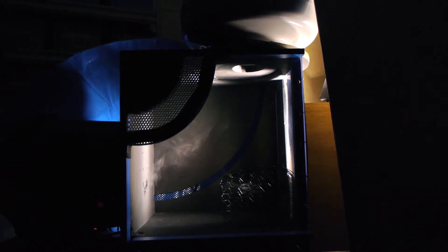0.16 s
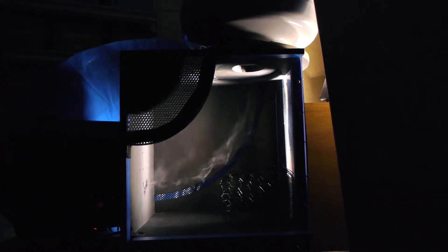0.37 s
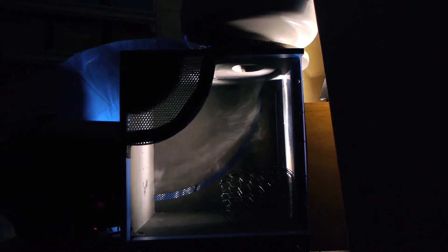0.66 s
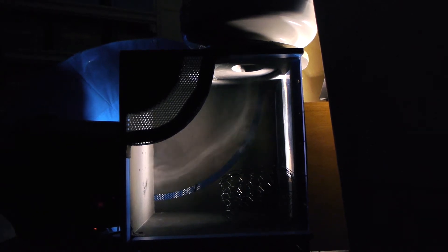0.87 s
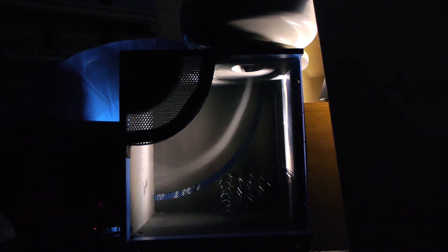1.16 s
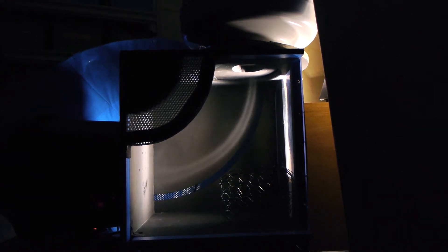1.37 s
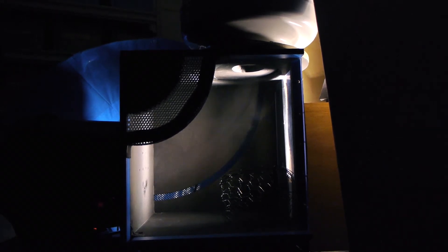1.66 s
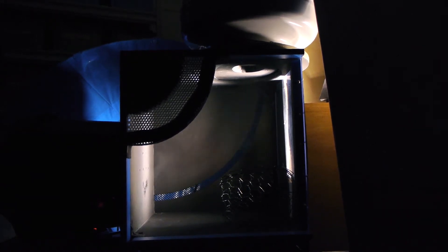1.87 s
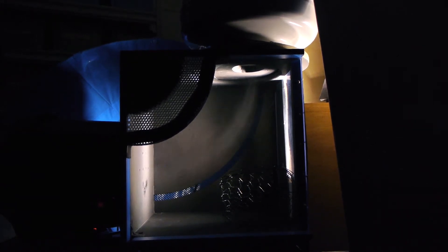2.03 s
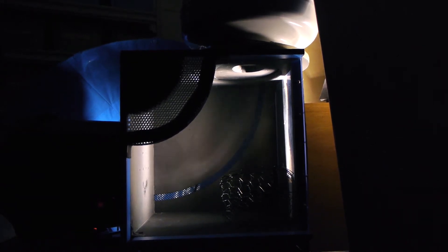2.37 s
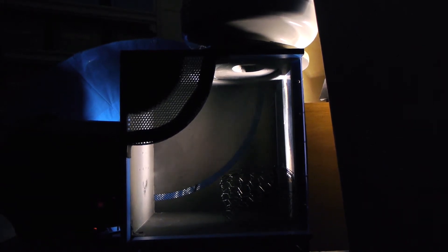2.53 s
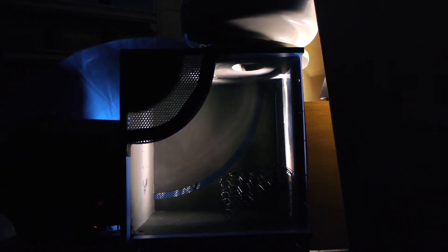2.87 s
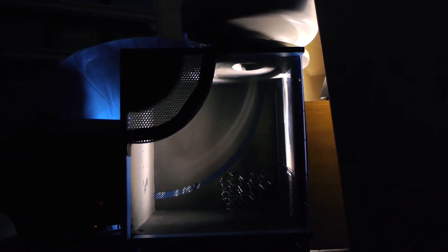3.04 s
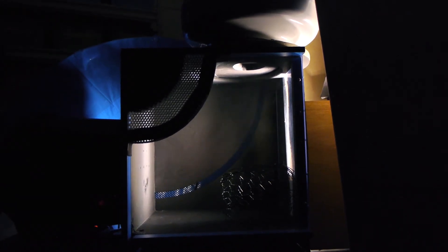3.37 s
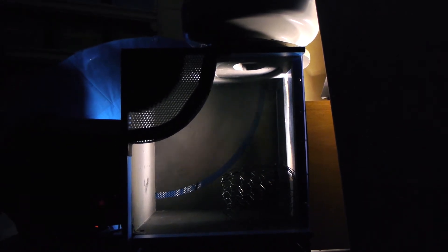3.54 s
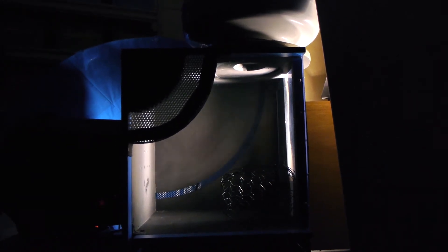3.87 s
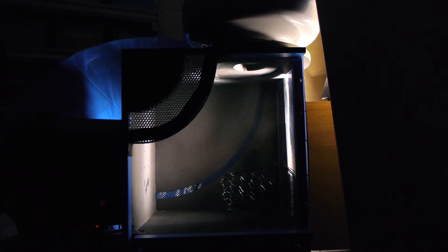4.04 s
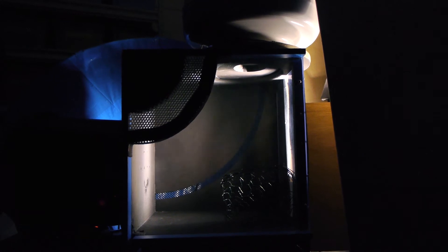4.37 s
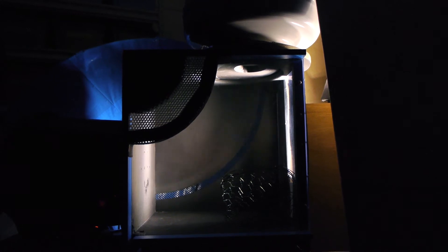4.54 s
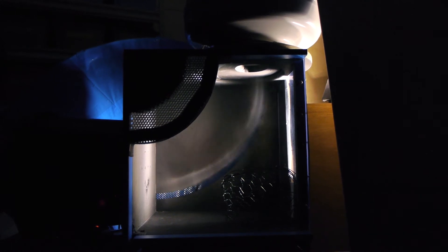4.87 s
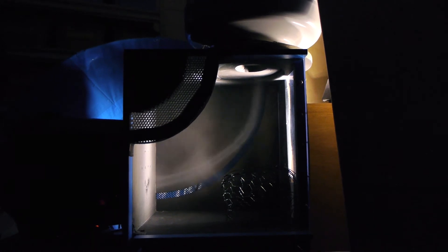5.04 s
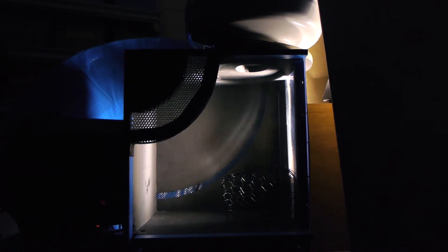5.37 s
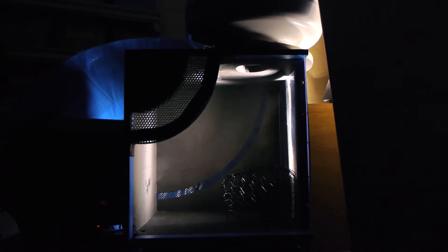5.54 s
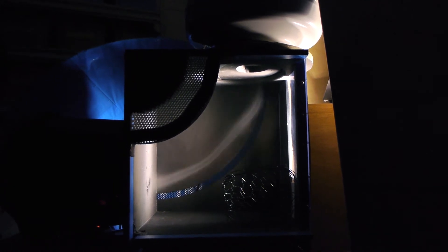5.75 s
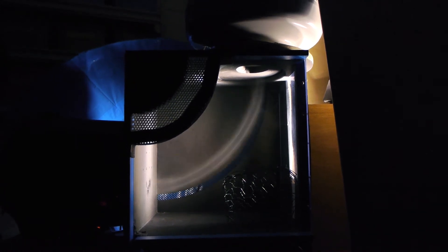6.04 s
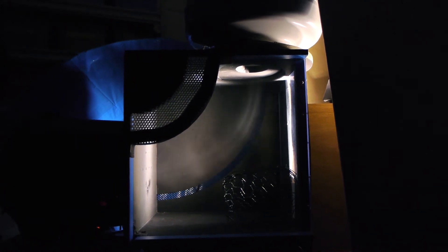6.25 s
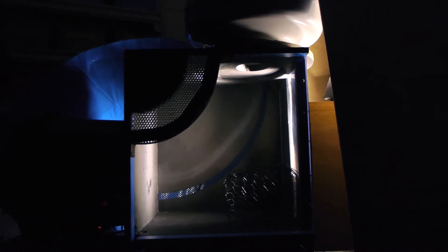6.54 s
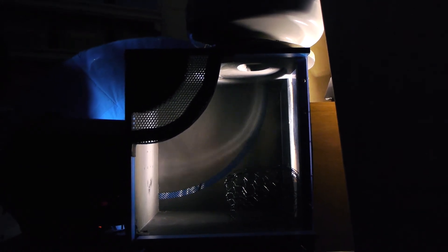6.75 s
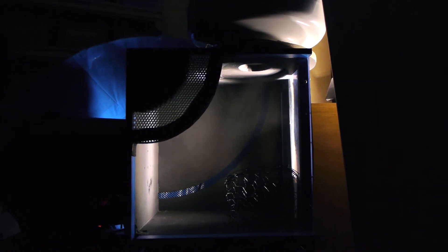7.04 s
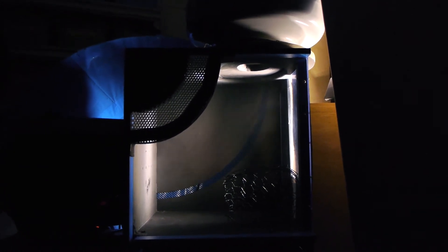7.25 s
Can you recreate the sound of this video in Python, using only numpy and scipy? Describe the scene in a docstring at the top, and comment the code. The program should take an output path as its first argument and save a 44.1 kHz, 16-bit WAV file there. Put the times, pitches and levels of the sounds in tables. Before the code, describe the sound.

Close to a duct fan drawing air through a small hard-walled box indoors. A faint electrical hum and dull room noise come first, with soft hiss puffs and a thin climbing whine. Airflow swells over three seconds, a low tone wavers and breaks up, then a loud broad rush holds with a fluttering deep boom.

```python
"""An inline duct fan draws air through a small enclosure, heard from close by.
At first summed sine tones make the motor's hum and drone over a dull noise background, with soft hiss puffs;
faint rotor harmonics climb and chirp through the housing's resonances. As the draught builds they sink under
filtered noise, the rush of air ringing the duct. Near two seconds a deep mode starts to sing unsteadily,
and breaks up after three, as a low boom of shaken duct modes grows, with separate throbs from strong eddies."""
import sys
import numpy as np
from scipy import signal
from scipy.fft import rfft, irfft, next_fast_len
from scipy.io import wavfile
from scipy.ndimage import uniform_filter1d

SR = 44100
rng = np.random.default_rng(int(sys.argv[2]) if len(sys.argv) > 2 else 0)


def file_out(sig):
    """Save sig as 16-bit WAV at sys.argv[1]."""
    # one column per channel
    cols = np.atleast_2d(sig).T
    # limit, then scale
    lim = np.clip(cols, -1, 1)
    pcm = np.round(lim * 32767).astype(np.int16)
    wavfile.write(sys.argv[1], SR, pcm)


N = 326781
TIME = np.arange(N) / SR  # s
SIZE = next_fast_len(N, real=True)
FREQS = np.maximum(np.arange(SIZE // 2 + 1) * SR / SIZE, 1)  # Hz, kept above zero for the logarithms


def from_db(db):
    """Logarithmic level: 20 dB is a tenfold amplitude."""
    return 10 ** (np.asarray(db) / 20)


def rms_one(x):
    """Power normalisation: scale to a mean square of one."""
    return x / np.sqrt(np.mean(np.abs(x) ** 2) + 1e-20)


def in_time(rows):
    """Linear interpolation: each column after the time becomes a curve, sample by sample."""
    start_s, *columns = np.transpose(rows)
    return [np.interp(TIME, start_s, column) for column in columns]


def at_hz(points, hz):
    """Logarithmic frequency scale: equal ratios of frequency are equal steps of interpolation."""
    table_hz, values = np.array(points).T
    return np.interp(np.log(hz), np.log(table_hz), values)


def drift(rate_hz):
    """Low-pass noise: a random modulation of spread 1, reaching up to about rate_hz."""
    step, settling = 40, 2000  # made at a lower sample rate; the filter's onset is dropped
    lowpass = signal.butter(2, rate_hz, fs=SR / step, output="sos")
    white = rng.standard_normal(N // step + settling + 2)
    slow = signal.sosfilt(lowpass, white)[settling:]
    return np.interp(np.arange(N) / step, np.arange(len(slow)), rms_one(slow))


def turning(hz):
    """Phase is the integral of frequency: a unit phasor follows the pitch from a random start."""
    cycles = np.cumsum(hz * np.ones(N)) / SR
    return np.exp(2j * np.pi * (cycles + rng.random()))


def bump(centre_s, half_s):
    """Gaussian envelope: a smooth swell of height 1 around a moment."""
    return np.exp(-.5 * ((TIME - centre_s) / half_s) ** 2)


def settle(start_hz, full_hz, settle_s):
    """Exponential approach: a pitch climbs fast at first and then levels off."""
    return full_hz + (start_hz - full_hz) * np.exp(-TIME / settle_s)


# the motor's hum as it takes up the load: start_s [s], pitch_hz [Hz], level_db [dB]
HUM = [(0, 210.7, -48.5), (.63, 216.6, -41), (.85, 218, -49), (1.2, 220, -47.5), (1.4, 221, -63)]
MAINS_HZ, MAINS_DB = 99.7, -52
DRONE_START_HZ, DRONE_FULL_HZ, DRONE_SETTLE_S, DRONE_DB = 103, 121.6, .5, -48.5


def motor(waver):
    """Superposition of tones: mains hum, loaded-motor hum and a deeper drone that swells as it settles."""
    hum_hz, hum_db = in_time(HUM)
    drone_hz = settle(DRONE_START_HZ, DRONE_FULL_HZ, DRONE_SETTLE_S)
    drone_gain = from_db(DRONE_DB) * (1 - np.exp(-TIME / DRONE_SETTLE_S))
    tones = [(MAINS_HZ, from_db(MAINS_DB)), (hum_hz, from_db(hum_db)), (drone_hz, drone_gain)]
    out = 0
    for hz, gain in tones:
        unsteady = 1 + waver * drift(22.0)
        out = out + gain * unsteady * turning(hz).real
    return np.sqrt(2) * out


# spectrum of the room's background: pitch_hz [Hz], relative level_db [dB per Hz]
ROOM = [(30, -20), (55, -4), (85, 3), (130, -7), (250, -9), (490, -4), (630, -8), (800, -27), (1400, -33),
        (2000, -24), (6000, -29), (15000, -43)]
FLOOR_DB = -56.5


def room(wide_above_hz):
    """Interaural coherence: a dull steady noise, alike at both ears in the bass and wide in the treble."""
    shared, left, right = rfft(rng.standard_normal((3, SIZE)))
    ratio = FREQS / wide_above_hz
    noise = (shared + ratio * np.array([left, right])) / np.sqrt(1 + ratio ** 2)
    shaped = noise * from_db(at_hz(ROOM, FREQS))
    return from_db(FLOOR_DB) * rms_one(irfft(shaped, SIZE)[:, :N])


# rotor tones: multiple of the base tone [ratio], level_db before the housing's lift [dB]
ROTOR = [(4, -67), (6, -67), (7, -66), (9, -79), (10, -86), (11, -74.5), (12, -77.5), (13, -79.5)]
# resonances of the fan housing: centre_hz [Hz], width_hz [Hz], lift_db [dB]
HOUSING = [(348, 70, 9), (984, 58, 22)]
ROTOR_START_HZ, ROTOR_FULL_HZ, SPIN_UP_S = 68, 150, 2.0  # base tone, with its time constant


def rotor(waver):
    """Resonance: climbing rotor harmonics chirp as each sweeps through the housing's peaks."""
    base_hz = settle(ROTOR_START_HZ, ROTOR_FULL_HZ, SPIN_UP_S)
    out = 0
    for multiple, level_db in ROTOR:
        hz = multiple * base_hz
        lift_db = 0
        for centre_hz, width_hz, peak_db in HOUSING:
            lift_db = lift_db + peak_db / (1 + (2 * (hz - centre_hz) / width_hz) ** 2)
        unsteady = 1 + waver * (drift(5.2) + 1j * drift(17))  # uneven inflow shakes level and phase
        out = out + from_db(level_db + lift_db) * unsteady * turning(hz)
    return np.sqrt(2) * out.real


# the draught builds at a steady rate, then eases into its full level
FULL_DB, RISE_DB_PER_S, RISE_S, EASE_S = -25, 8, 3.435, 0.69


def draught():
    """Saturating growth: the flow's level in dB rises steadily up to a soft knee."""
    return FULL_DB - RISE_DB_PER_S * EASE_S * np.logaddexp(0, (RISE_S - TIME) / EASE_S)


# resonances of duct and enclosure: centre_hz [Hz], width_hz [Hz], lift_db [dB]
DUCT = [(73, 2, 16), (126, 14, 4.5), (239, 7, 8), (263, 8, 8.1), (276, 8, 9.7), (291, 5, 10.0),
        (310, 6, 9.4), (328, 7, 13.9), (344, 8, 10.5), (375, 12, 8.8), (408, 19, 10.5), (470, 24, 6.9),
        (497, 6, 4.7), (517, 7, 11.0), (532, 5, 6.3), (581, 4, 7.5), (598, 9, 8.4), (641, 14, 13.1),
        (670, 4, 2.2), (690, 11, 13.9), (723, 11, 10.8), (762, 5, 10.7), (802, 6, 6.7), (818, 5, 7.5),
        (853, 42, 8.0), (913, 11, 12.2), (930, 22, 9.0), (981, 10, 8.8), (1007, 10, 11.8), (1029, 11, 9.7),
        (1063, 7, 7.7), (1087, 4, 4.8), (1112, 10, 6.1), (1167, 35, 6.4), (1194, 4, 6.3), (1211, 11, 7.5),
        (1341, 30, 10.2), (1395, 4, 5.0), (1404, 55, 4.7), (1443, 13, 5.0), (1514, 33, 5.9),
        (1617, 11, 10.5), (1638, 11, 8.8), (1745, 28, 10.1), (1805, 4, 6.6), (1819, 6, 6.3),
        (1864, 31, 6.4), (1944, 28, 5.3), (2080, 17, 8.1), (2295, 13, 4.5), (2435, 10, 6.3),
        (2502, 14, 10.0), (2777, 55, 4.6), (2896, 20, 5.0), (2975, 80, 3.5), (3256, 13, 4.1),
        (3837, 65, 5.2), (4217, 250, 2.9)]


def duct(hz):
    """Resonance: the complex response lifts narrow bands, and each rings on."""
    response = 1
    for centre_hz, width_hz, lift_db in DUCT:
        detune = 1j * (hz ** 2 - centre_hz ** 2) / (hz * width_hz)
        response = response * (detune + from_db(lift_db)) / (detune + 1)
    return response


def enclosure(echo, decay_s, above_hz):
    """Interference: dense short echoes between hard walls ripple the treble; responses for mid and side."""
    decay = np.exp(-np.minimum(np.arange(SIZE) / SR / decay_s, 50))
    tail = rng.standard_normal((2, SIZE)) * decay
    treble = FREQS ** 2 / (FREQS ** 2 + above_hz ** 2)
    return 1 + echo * rms_one(rfft(tail)) * treble


# turbulence before the duct's resonances: pitch_hz [Hz], relative level_db [dB per Hz]
RUSH = [(30, -45), (85, -14), (115, 0.5), (250, -0.97), (440, -15), (620, -1.9), (800, -11), (1100, -7.5),
        (1400, -8), (1650, -14.5), (2100, -14.5), (3400, -16.5), (4700, -16.5), (7000, -21), (10500, -24.5),
        (15000, -36.5)]
# rush thrown back by the room, opposite at the two ears: pitch_hz [Hz], relative level_db [dB per Hz]
DIFFUSE = [(41, -16), (70, -16), (107, -16), (188, -13.5), (462, -14), (676, -2), (740, -6), (886, 1),
           (1360, 1.5), (1660, -4.5), (2980, -4), (10700, -15), (15000, -27)]
# the air outlet lies a little to one side: pitch_hz [Hz], left minus right level_db [dB]
LEAN = [(1500, 0), (2800, 1.5), (5500, 0)]
# eddies get finer as the air speeds up: pitch_hz [Hz], growth [dB gained per dB of flow]
GROWTH = [(40, 0), (100, 1), (200, 1.8), (400, 0.88), (800, 1.15), (1600, 1.03), (3200, 1.15), (5000, 1.17),
          (10000, 1.64)]


def rush(flow_db, level_db, diffuse_db, flicker_db):
    """Turbulent broadband noise: it gets louder and brighter with the flow, and each octave flickers."""
    mid, side = rfft(rng.standard_normal((2, SIZE))) * enclosure(echo=.24, decay_s=.018, above_hz=2000)
    mid = mid * from_db(level_db) * rms_one(from_db(at_hz(RUSH, FREQS)) * duct(FREQS))
    side = side * from_db(diffuse_db) * rms_one(from_db(at_hz(DIFFUSE, FREQS)))
    left_right = np.array([[1], [-1]])
    air = (mid + side * left_right) * from_db(at_hz(LEAN, FREQS) / 2 * left_right)
    full_db = np.median(flow_db[N // 2:])
    octave = np.clip(np.log2(FREQS / 50), 0, 8)  # octaves above 50 Hz
    out = 0
    for k in range(9):
        crossfade = np.maximum(1 - np.abs(octave - k), 0)  # neighbouring bands sum to one
        band = irfft(air * crossfade, SIZE)[:, :N]
        growth = at_hz(GROWTH, 50 * 2 ** k)
        out = out + band * from_db(growth * (flow_db - full_db) + flicker_db * drift(8.9))
    return from_db(full_db) * out


# puffs of hiss: centre_s [s], half_s [s], level_db [dB], centre_hz [Hz], width [octaves]
PUFFS = [(0.057, 0.05, -56, 4100, 0.6), (0.083, 0.0036, -54, 3500, 0.16), (0.076, 0.077, -74, 10100, 1.0),
         (0.394, 0.29, -65.5, 8950, 1.4), (0.557, .03, -69, 12000, .8), (.705, 0.05, -68, 11500, .8),
         (1.81, .015, -62, 12000, .8), (4.85, .01, -57, 13500, .25), (5.15, .01, -59, 13200, .25),
         (5.92, .01, -59, 13200, .25)]


def puffs(grain_db):
    """Band-limited noise bursts: soft, slightly grainy puffs of hiss."""
    white = rng.standard_normal((2, N)) * from_db(grain_db * drift(150))
    out = 0
    for centre_s, half_s, level_db, centre_hz, octaves in PUFFS:
        half_band = 2 ** (octaves / 2)
        edges_hz = [centre_hz / half_band, min(centre_hz * half_band, .45 * SR)]
        bandpass = signal.butter(1, edges_hz, "band", fs=SR, output="sos")
        band = rms_one(signal.sosfilt(bandpass, white))
        out = out + band * from_db(level_db) * bump(centre_s, half_s)
    return out


def buffeting(width_hz, even_s, ragged):
    """Random excitation of a mode: steady at ragged 0, shaken by eddies at 1; even in the long run."""
    eddies = drift(width_hz / 2) + 1j * drift(width_hz / 2)
    shake = np.sqrt(1 - ragged) + np.sqrt(ragged / 2) * eddies
    power = uniform_filter1d(np.abs(shake) ** 2, int(even_s * SR))
    return shake / np.sqrt(power + 1e-9)


# deep duct modes: pitch_hz [Hz], width_hz [Hz], level_db at full flow [dB], growth [dB gained per dB of flow]
BOOM = [(152.9, 7.9, -35.5, 0.7), (167, 13.5, -28.5, 1), (188, 11, -30, 1.2), (213.9, 20.8, -25, 1.08)]
# below this flow the deep modes barely catch, and fall away this much faster (dB per dB)
CATCH_DB, CATCH_FALL = -44, 1.2
# the boom dips once, by this many dB
FALTER_AT_S, FALTER_HALF_S, FALTER_DB = 2.9, 0.035, 11


def boom(flow_db):
    """Modal excitation: small eddies keep the deep modes rumbling; they grow with the draught."""
    slow_flow_db = CATCH_FALL * np.maximum(CATCH_DB - flow_db, 0)
    held_back_db = slow_flow_db + FALTER_DB * bump(FALTER_AT_S, FALTER_HALF_S)
    out = 0
    for hz, width_hz, level_db, growth in BOOM:
        gain = from_db(level_db + growth * (flow_db - FULL_DB) - held_back_db)
        out = out + gain * buffeting(width_hz, even_s=0.077, ragged=1.0) * turning(hz)
    return np.sqrt(2) * out.real


# short swells of the deep modes: centre_s [s], half_s [s], pitch_hz [Hz], peak level_db [dB]; the first is a
# brief early burst of the lowest mode's singing tone, the rest are strong eddies
THROBS = [(1.397, 0.088, 158.7, -40), (1.814, 0.025, 165, -33.5), (3.36, 0.044, 212.8, -23.5),
          (3.434, 0.019, 167.8, -18.5), (3.746, .014, 187.7, -18.5), (4.171, 0.018, 212.4, -17),
          (4.278, 0.021, 219, -19), (4.33, 0.021, 165.4, -20.5), (4.34, 0.031, 189, -21),
          (4.79, 0.028, 219.7, -20.5), (4.905, 0.02, 170.5, -15), (4.99, 0.027, 167.8, -16),
          (5.128, 0.044, 220.4, -19.5), (5.216, 0.043, 188, -17.5), (5.269, 0.011, 220.7, -15),
          (5.38, 0.052, 188, -21), (5.434, 0.071, 216, -24.5), (5.986, 0.038, 204, -17),
          (6.08, 0.05, 164.4, -22), (6.093, 0.028, 213, -16), (6.196, 0.016, 176.6, -14),
          (6.323, 0.052, 186, -18), (6.39, 0.057, 211.6, -19), (6.53, 0.022, 206.6, -22),
          (6.732, 0.031, 215.4, -21), (6.822, 0.051, 168.2, -22.5), (6.91, 0.012, 219.3, -13.5),
          (6.973, 0.019, 208.2, -11.5)]


def throbs():
    """Transient excitation: each row swells a deep mode for a short while."""
    out = 0
    for centre_s, half_s, hz, level_db in THROBS:
        out = out + from_db(level_db) * bump(centre_s, half_s) * turning(hz).real
    return np.sqrt(2) * out


# the lowest mode holds a tone, sags in pitch, then breaks up: start_s [s], pitch_hz [Hz], level_db [dB]
SINGING = [(1.85, 164, -70), (2.03, 163.8, -33), (2.4, 163, -33.5), (2.7, 164.2, -31.5), (2.81, 160.7, -25),
           (2.9, 148, -29.5), (2.95, 122.2, -30), (2.985, 155.7, -22), (3.03, 152, -29), (3.07, 165, -17.5),
           (3.12, 160.7, -27), (3.22, 167.7, -19), (3.29, 153.5, -21), (3.33, 151.8, -33), (3.4, 152, -70)]


def singing(ragged, octave_db):
    """Self-sustained tone: the lowest mode sings unsteadily, and squaring its phasor adds a weak octave."""
    hz, level_db = in_time(SINGING)
    tone = buffeting(width_hz=16.0, even_s=0.14, ragged=np.clip(ragged, 0, 1)) * turning(hz)
    with_octave = tone + from_db(octave_db) * tone ** 2
    return np.sqrt(2) * from_db(level_db) * np.real(with_octave)


def scene():
    """Superposition: the low tones sit in the middle, the rush spreads around them."""
    flow_db = draught()
    hum = motor(waver=0.28)
    background = room(wide_above_hz=1400)
    whine = rotor(waver=.12)
    air = rush(flow_db, level_db=1.61, diffuse_db=-12.3, flicker_db=0.5)
    hiss = puffs(grain_db=1.0)
    low = boom(flow_db) + throbs() + singing(ragged=.06, octave_db=-15)
    return hum + background + whine + air + hiss + low


CUTOFF_HZ = 15200


def record(dry):
    """Elliptic low-pass: the top is cut steeply."""
    lowpass = signal.ellip(10, .1, 80, CUTOFF_HZ, fs=SR, output="sos")  # order, ripple dB, stopband dB
    return signal.sosfilt(lowpass, dry)


dry = scene()
out = record(dry)
file_out(out)
```